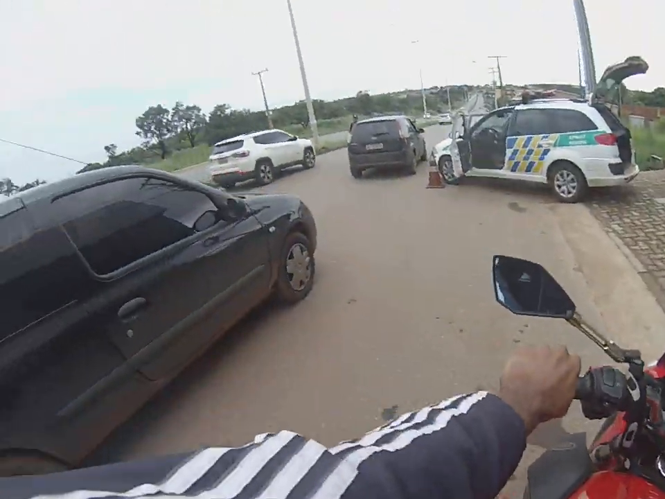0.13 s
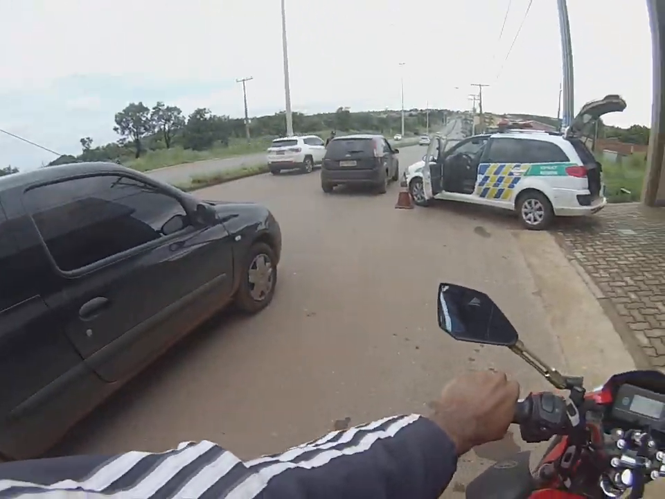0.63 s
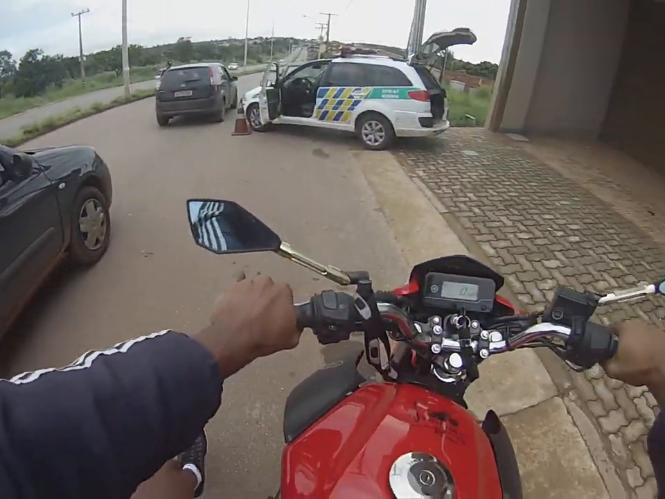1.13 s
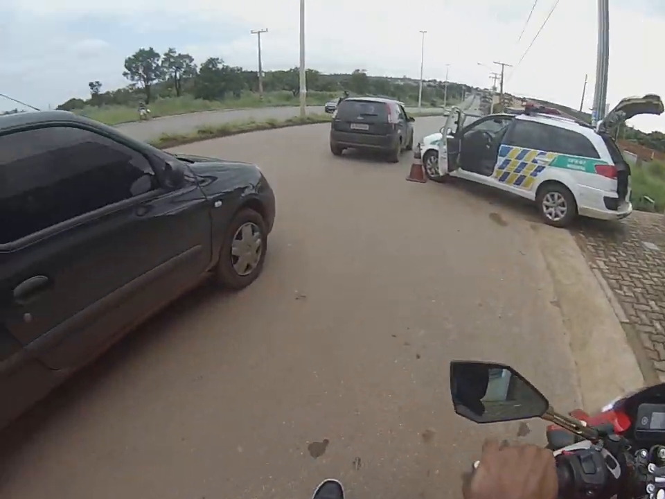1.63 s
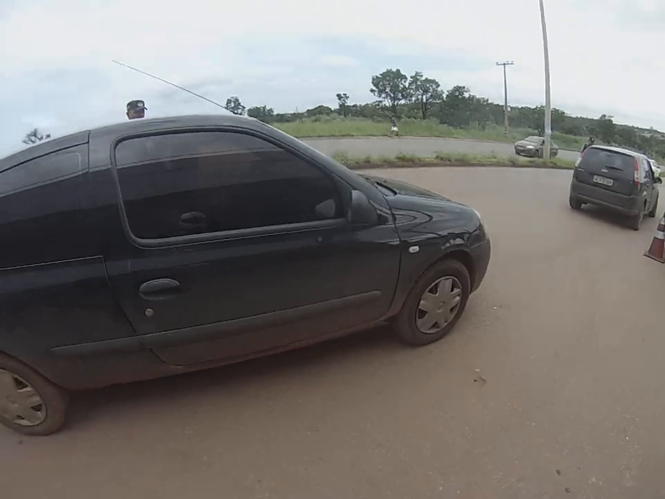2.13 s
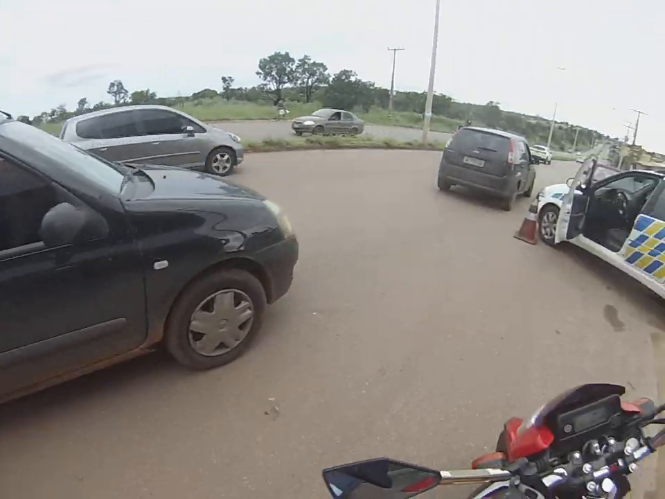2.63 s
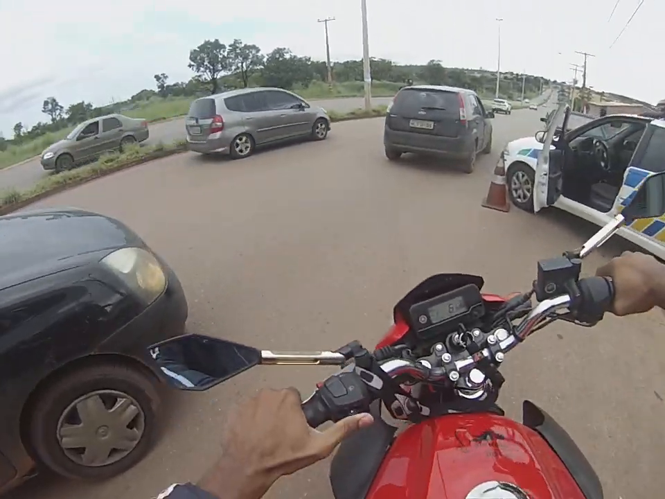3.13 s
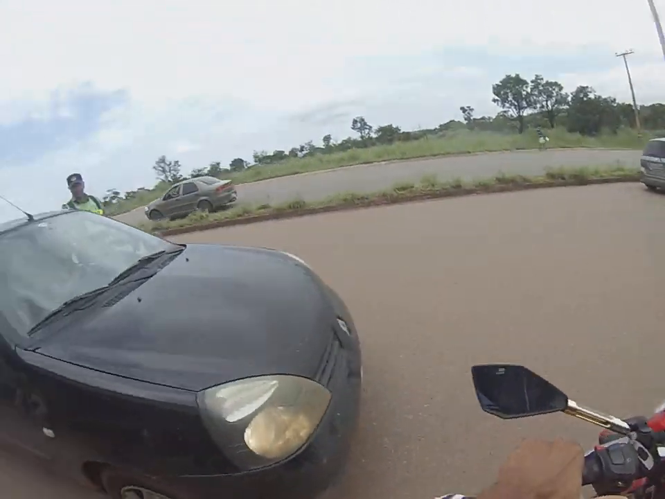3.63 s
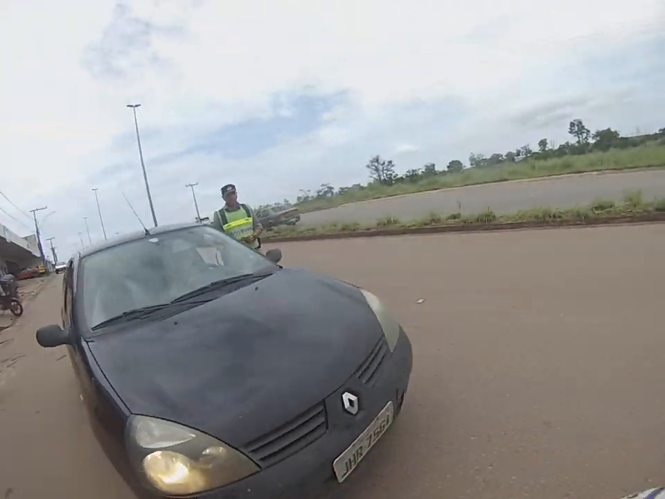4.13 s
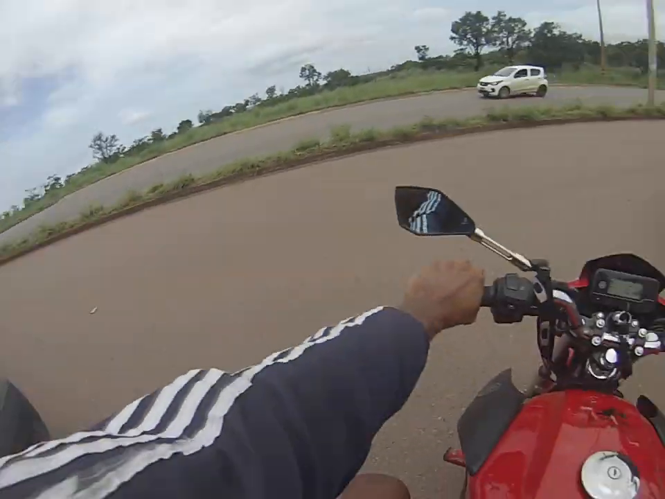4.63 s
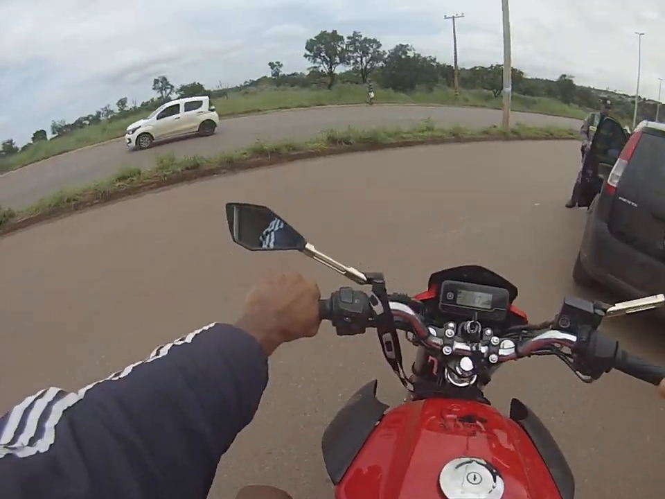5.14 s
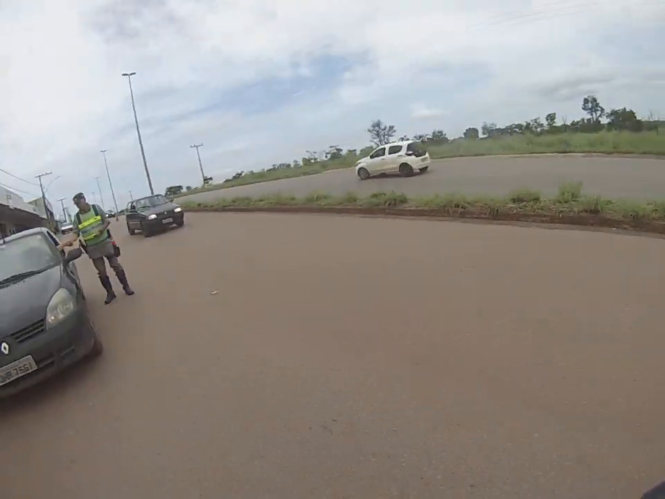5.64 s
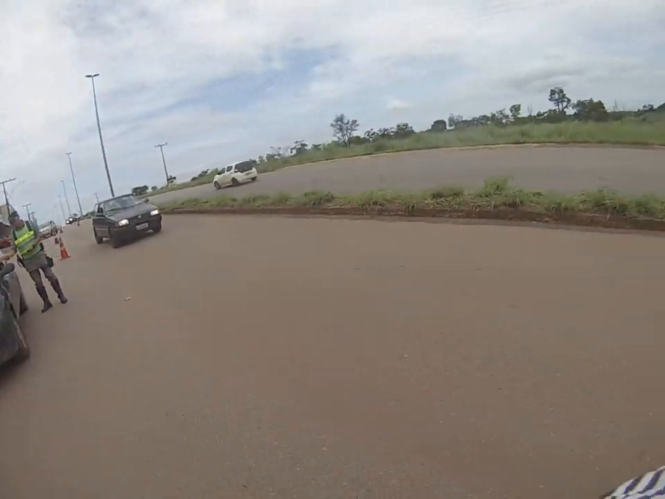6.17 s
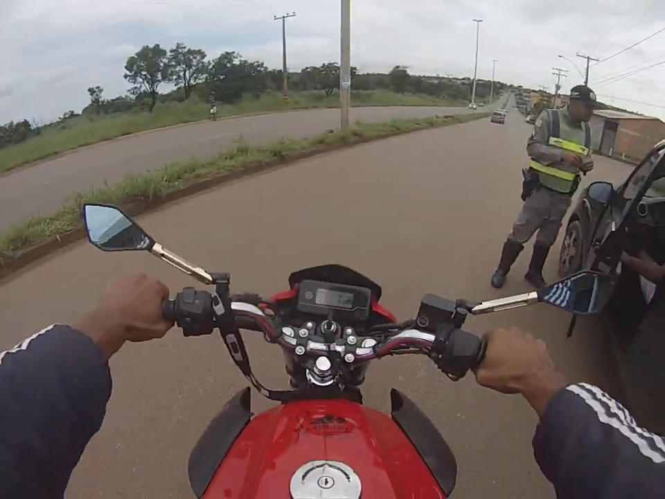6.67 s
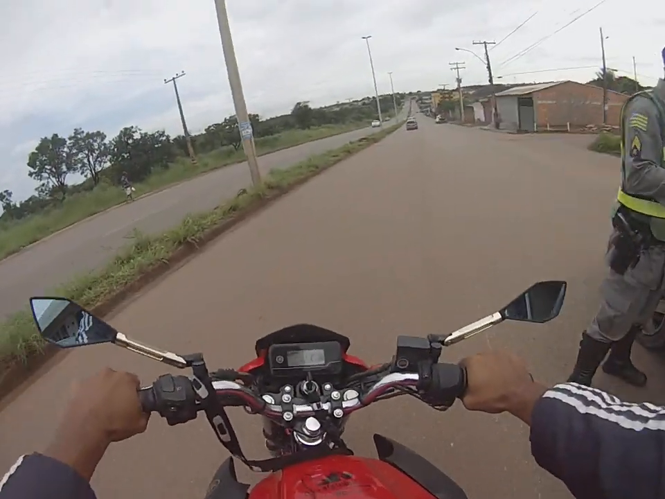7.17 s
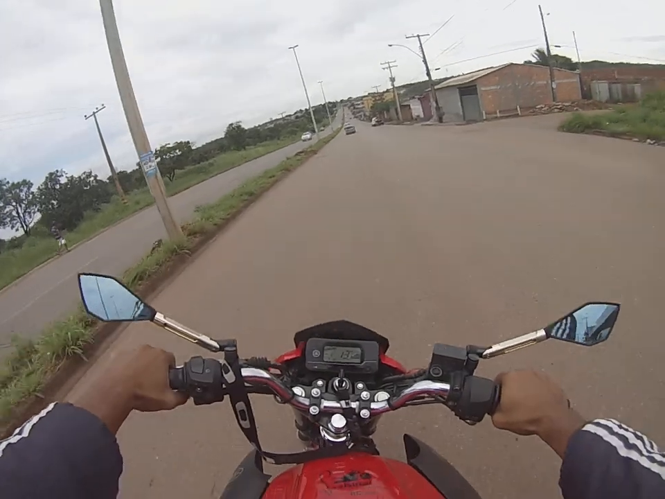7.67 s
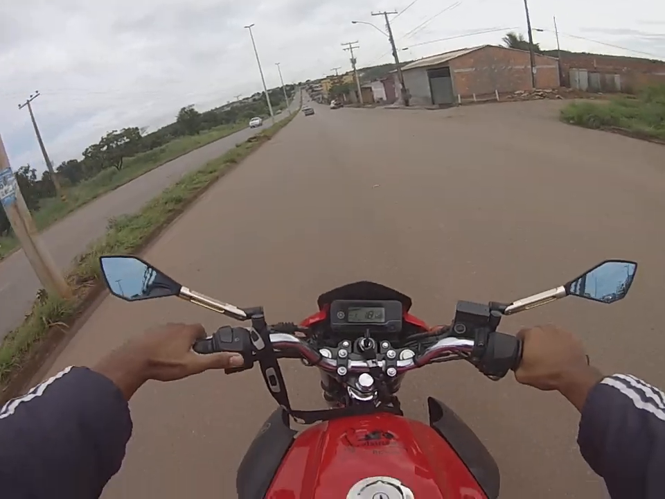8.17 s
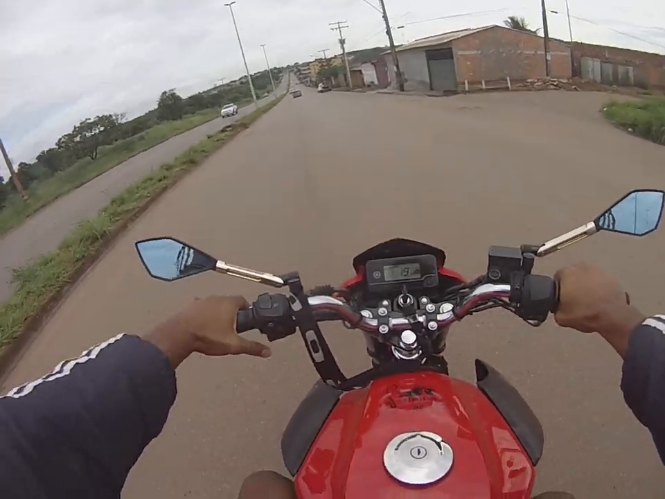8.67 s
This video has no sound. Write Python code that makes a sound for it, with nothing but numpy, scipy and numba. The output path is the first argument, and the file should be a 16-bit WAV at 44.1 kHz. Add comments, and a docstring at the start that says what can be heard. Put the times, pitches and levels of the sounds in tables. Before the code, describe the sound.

Muffled helmet view of a lumpy motorcycle idle, a violent plastic knock near five seconds, then throttle opens and revs rise steadily.

```python
"""On a motorcycle in traffic, heard by a helmet camera muffled in its case: one cylinder idles, then pulls away.
Each firing rings the exhaust pipe as decaying sines; under load the pressure fronts add thin snaps.
Shaped noise makes the engine drone, ticking valve gear, wind rumble, traffic hiss, whirs and cloth rustles.
The rider snaps the visor shut: blows ring shell, visor and latch, overload the input and duck the gain."""
import sys
import numpy as np
from scipy import signal
from scipy.fft import rfft, irfft, next_fast_len
from scipy.io import wavfile
from scipy.ndimage import uniform_filter1d
from numba import njit

SR = 44100
rng = np.random.default_rng(int(sys.argv[2]) if len(sys.argv) > 2 else 0)


def makeup_ratio(level_db):
    """Linear amplitude ratio for a level in decibels (20 dB per factor of ten)."""
    decades = np.asarray(level_db, float) / 20
    return 10 ** decades


def inscribe(sig):
    """Save sig as 16-bit PCM at rate SR to the path in sys.argv[1].

    A 1-D sig is mono; a 2-D sig holds one channel per row.
    Samples are clipped to [-1, 1] before scaling.
    """
    pcm = np.round(np.clip(np.atleast_2d(sig).T, -1, 1) * 32767)
    wavfile.write(sys.argv[1], SR, pcm.astype(np.int16))


N = 387638
T = np.arange(N) / SR


def curve(table):
    """Columns of a table drawn as signals over its first column, in seconds."""
    s, *columns = np.transpose(table)
    return [np.interp(T, s, c) for c in columns]


def colour(x, points):
    """Shape the spectrum by (Hz, dB) points, straight in log frequency; rms 1."""
    hz, db = np.transpose(points)
    size = next_fast_len(N)
    bins_hz = np.arange(size // 2 + 1) * SR / size
    gain = makeup_ratio(np.interp(np.log(bins_hz + 1), np.log(hz), db))
    y = irfft(rfft(x, size) * gain, size)[:N]
    return y / np.std(y)


def noise(points):
    """Steady noise of rms 1 with the given spectrum."""
    return colour(rng.standard_normal(N), points)


def smooth_twice(x, k):
    """Two running means of k samples."""
    return uniform_filter1d(uniform_filter1d(x, k), k)


def walk(rate):
    """Random levels held 1 / rate s and slewed twice; spread near 0.5."""
    k = int(SR / rate)
    held = np.repeat(rng.standard_normal(N // k + 1), k)
    return 0.7 * smooth_twice(held, k)[:N]


def ring(hz, t60, length):
    """Decaying sines, one row a mode, each falling 60 dB in its t60."""
    t = T[:int(length * SR)]
    decay = np.exp(-np.log(1000) * np.outer(1 / t60, t))
    return np.sin(2 * np.pi * np.outer(hz, t)) * decay


def strike(blows, modes):
    """Ring a body's (Hz, dB, t60 s) modes with a signal of blows."""
    hz, db, t60 = np.transpose(modes)
    return signal.fftconvolve(blows, makeup_ratio(db) @ ring(hz, t60, .8))[:N]


def add(out, i, x):
    """Mix x into out from sample i."""
    out[i:i + len(x)] += x[:len(out) - i]


def background_swing():
    """Slow swing shared by the steady layers, in dB; each layer takes its own share of it."""
    # Level of the steady background. Each row: time in seconds, swing in dB before a layer's share.
    swing = [(0, -4), (.5, 1.1), (1, -1.8), (1.6, 1.2), (2.4, 0.4), (3, 3), (3.7, 1.1), (4.1, -1),
             (4.6, 1.5), (5.5, 4), (6.3, 1), (6.8, -1), (7.8, -6.5), (8.4, -4.5), (8.79, -2)]
    return curve(swing)[0]


def traffic_hiss():
    """Traffic hisses through the case: noise weighted to the lower treble, wavering in level."""
    # Spectrum of the traffic through the case. Each row: frequency in Hz, level in dB.
    spectrum = [(500, -4), (800, -0.5), (1600, -6), (1800, -14.5), (2200, -11), (2900, -28.5), (4000, -40),
                (8000, -62)]
    level_db = -47 + 1.05 * background_swing()
    return makeup_ratio(level_db + 1.3 * walk(13)) * noise(spectrum)


def wind():
    """Wind on the microphone port: low rumble that wanders slowly and swells in gusts."""
    # Gusts on the port. Each row: peak time in seconds, rise above the breeze in dB, bell width in seconds.
    gusts = [(3.96, 10.5, .07), (6.82, 7, 0.12), (8.79, 9, 0.11)]
    level_db = -42.5 + 0.66 * background_swing()
    for s, db, width in gusts:
        level_db = level_db + db * np.exp(-.5 * ((T - s) / width) ** 2)
    rumble = noise([(8, -6.5), (25, 10.5), (45, 16), (80, 1.5), (200, -51.0)])  # Hz, dB
    return makeup_ratio(level_db + 3.6 * walk(1.6)) * rumble


def rustles():
    """Jacket and strap: brief bright scratches of noise that start at once and die away."""
    # Cloth scratches. Each row: start in seconds, level in dB, decay time in ms.
    scratches = [(.59, -47, 30), (0.853, -55, 16), (1.44, -53, 21), (3.508, -46, 2.4), (3.6965, -37.5, 3.4),
                 (3.851, -53, 3), (4.346, -50.5, 5.5), (4.43, -49, 3.7)]
    # Spectrum of the cloth. Each row: frequency in Hz, level in dB.
    spectrum = [(2000, -30), (3500, -6.5), (4500, 7), (6000, -3.5), (8500, -11), (12000, -18.5),
                (16000, -51.5)]
    envelope = np.zeros(N)
    for s, db, ms in scratches:
        add(envelope, int(s * SR), makeup_ratio(db) * np.exp(-T[:4000] * 1000 / ms))
    return envelope * noise(spectrum)


def whirs():
    """Running gear: noise rung through narrow resonances swells in and out."""
    # Whirs. Each row: pitch in Hz, ring t60 in seconds, start in seconds, end in seconds, level in dB.
    resonances = [(2070, .16, 6.3, 7.6, -61), (4300, .02, 8.1, 9.2, -65), (1250, .06, 8.3, 9.2, -62)]
    out = np.zeros(N)
    for hz, t60, start, end, db in resonances:
        tone = strike(rng.standard_normal(N), [(hz, 0, t60)])
        progress = np.clip((T - start) / (end - start), 0, 1)
        fade = np.sqrt(np.sin(np.pi * progress).clip(0))
        out += makeup_ratio(db) * tone / np.std(tone) * fade
    return out


def firing_swell(cycles):
    """Envelope that jumps up close to each firing and dies away over part of the cycle."""
    return smooth_twice(np.exp(-((cycles + 0.057) % 1) / 0.31), 150)


def drone(cycles):
    """Engine drone: low noise that swells with each firing."""
    # Spectrum of the drone. Each row: frequency in Hz, level in dB.
    spectrum = [(30, -20.5), (90, -3.5), (160, -2), (270, -7.5), (400, -3.5), (520, -9), (640, -20),
                (800, -36), (1200, -84)]
    level_db = -25 + 0.79 * background_swing()
    return (1 + 0.38 * firing_swell(cycles)) * makeup_ratio(level_db + 1.15 * walk(25)) * noise(spectrum)


def valve_gear(cycles):
    """Valve gear ticks as treble noise swelling with each firing; a brighter rattle follows and grows under load."""
    # Spectrum of the valve gear. Each row: frequency in Hz, level in dB.
    valve_spectrum = [(2500, -18.5), (3400, -4.5), (4200, 3), (5300, -1), (6500, -7), (8000, -13),
                      (11600, -19), (14000, -40), (16000, -70)]
    # Spectrum of the bright rattle. Each row: frequency in Hz, level in dB.
    rattle_spectrum = [(3000, -30), (4400, -5), (6000, -0.5), (8000, -1), (11000, -6), (14000, -12),
                       (16000, -45)]
    rattle_db, rattle_cycles = -4.5, .2  # against the valve gear; decay in engine cycles
    pull_s, load_db = 5.8, 5  # the throttle opens and the rattle grows
    level_db = -61 + .95 * background_swing()
    valves = (1 + .5 * firing_swell(cycles)) * makeup_ratio(level_db + 0.65 * walk(30)) * noise(valve_spectrum)
    puff = uniform_filter1d(np.exp(-((cycles - 0.02) % 1) / rattle_cycles), size=80)
    rattle_level_db = level_db + rattle_db + load_db * (T > pull_s) + 5 * walk(14)
    return valves + puff * makeup_ratio(rattle_level_db) * noise(rattle_spectrum)


def knocks(blow=0.39, contact_hz=(900, 3500, 9000)):
    """Visor: a blow and a short scrape ring shell, visor plastic and metal latch; softer parts get a duller push."""
    # Visor knocks. Each row: start in seconds, level in dB, scrape time constant in ms,
    # push on the visor in dB against the shell, push on the latch in dB against the shell.
    hits = [(4.777, -32, 2.4, 10, -6), (4.855, -38.5, 2.2, 14, 10.5), (4.939, -26, 5.4, 1, -17),
            (4.958, -1, 4.6, -9.5, -30), (4.967, 1.5, 3.2, -3.5, -27.5), (4.9961, -2, 2.6, 1, -21),
            (5.012, -1.5, 4.2, -15, -35), (5.021, -3, 2.5, -14, -31), (5.0372, 23.5, 0.9, 4, -2),
            (5.047, 3, 2.2, -3.5, -28), (5.8915, -32, 1, 7, -6)]
    # Modes of the helmet shell. Each row: frequency in Hz, level in dB, t60 in seconds.
    shell = [(267, -10.5, 0.0028), (365, -9, 0.015), (450, -0.5, 0.05), (524, -5.5, 0.084)]
    # Modes of the visor plastic. Each row: frequency in Hz, level in dB, t60 in seconds.
    visor = [(870, -6, 0.012), (1135, -5, 0.018), (1490, 0, 0.0054), (1794, -3, 0.0093), (2210, -13, 0.019)]
    # Modes of the metal latch. Each row: frequency in Hz, level in dB, t60 in seconds.
    latch = [(3070, -4, 0.0095), (5050, -7, 0.0073), (6900, -19, 0.005), (2290, -42, 0.25),
             (2720, -54.5, 0.91), (3058, -57.5, .55), (3305, -57, 0.39), (5093, -58.5, 0.35)]
    pushes = np.zeros((3, N))
    for s, db, ms, visor_db, latch_db in hits:
        u = T[:3000] * 1000 / ms
        # a brief snap is nearly all blow, a long drag nearly all scrape
        scrape = min(ms / 3, 1) * rng.standard_normal(3000) * u * np.exp(-u)
        burst = scrape / np.sqrt(ms * SR / 4000)
        burst[0] -= blow
        for push, share_db in zip(pushes, (0, visor_db, latch_db)):
            add(push, int(s * SR), makeup_ratio(db + share_db) * burst)
    out = np.zeros(N)
    for push, hz, modes in zip(pushes, contact_hz, (shell, visor, latch)):
        softened = signal.lfilter(*signal.butter(2, hz, fs=SR), push)
        out += strike(softened, modes)
    return out


def exhaust(rate, cycles, scatter_db=.6, detune=.002, snap_scatter_db=1.8):
    """Each firing pushes gas into the pipe; hot gas carries sound faster, so most modes rise with engine speed."""
    # Pipe modes at gas heat 0, 0.5 and 1. Each row: frequency in Hz, t60 in seconds, signed relative gain.
    pipe_idle = [(59.5, 0.087, -0.17), (102, 0.18, 0.67), (143.4, 0.055, 0.94), (174.1, 0.23, -0.29),
                 (237, 0.02, -0.69), (330, 0.02, -0.48), (369.4, 0.26, -0.28), (493, 0.15, -0.97),
                 (600, .04, 0.73)]
    pipe_pull = [(76, 0.037, 0.061), (112.8, 0.07, 0.54), (140, 0.024, 0.17), (186.3, 0.11, -0.55),
                 (310, 0.042, -0.86), (377, 0.2, 0.1), (428, 0.053, -0.22), (506.3, .12, -0.24),
                 (580, 0.057, .06)]
    pipe_rev = [(96, 0.051, 0.3), (142, 0.024, 0.13), (183, 0.05, 0.68), (206.9, 0.12, -0.69),
                (310, 0.045, -0.49), (381, 1, 0.059), (436.3, 0.085, -0.54), (533, 0.087, -0.14),
                (566, 0.037, 0.27)]
    # Width of the gas push: its bell's standard deviation in ms at gas heat 0, 0.5 and 1.
    push_ms = (1, 0.62, 0.39)
    # Strength of the firings. Each row: time in seconds, level in dB.
    firing = [(0, 2), (3.96, 2.5), (4.03, 1), (4.3, 1.5), (4.95, 3.5), (6.28, 4), (6.55, 5.5), (6.7, 3.1),
              (7.5, 2.8), (7.75, -1.5), (8.79, -1)]
    # Spectrum of the snaps. Each row: frequency in Hz, level in dB.
    snap_spectrum = [(300, -13.5), (800, 5), (2000, -1), (4000, -8), (8000, -17.5), (12000, -23.5),
                     (16000, -45)]
    cold_rate, hot_rate = 10, 41.9  # firings per second at gas heat 0 and 1
    snap_db, snap_from_heat = -27, .15  # against the firing level, before colouring; none at idle
    rebound_ms, rebound_db = 4.6, -8  # the trough after the crest snaps too
    crackle_size, crackle_ms = .2, 1.1  # turbulent tail against the front; decay time

    heat = np.clip((rate - cold_rate) / (hot_rate - cold_rate), 0, 1)
    firing_db = curve(firing)[0]
    pipes = np.array([pipe_idle, pipe_pull, pipe_rev])
    pipe, snaps = np.zeros(N), np.zeros(N + SR)
    for i in np.flatnonzero(np.diff(np.floor(cycles))):
        chance = rng.standard_normal(13)
        share = np.clip(1 - np.abs(2 * heat[i] - np.arange(3)), 0, 1)  # blend of the three heats
        hz, t60, gain = np.tensordot(share, pipes, axes=1).T
        push = np.exp(-.5 * (np.arange(-200, 201) * 1000 / SR / (share @ push_ms)) ** 2)
        tone = gain @ ring(hz * (1 + detune * chance[:9]), t60, 0.34)
        pulse = signal.fftconvolve(tone, push / push.sum())
        # the valve opens 2.6 ms before the pressure crest
        start = i - 200 - int(.0026 * SR)
        add(pipe, start, makeup_ratio(firing_db[i] + scatter_db * chance[9]) * pulse)

        # under load the pressure front steepens into a thin snap with a crackling tail
        crackles = crackle_size * rng.standard_normal((2, 200)) * np.exp(-T[:200] * 1000 / crackle_ms)
        crackles[:, 0] = 1
        snap = (heat[i] > snap_from_heat) * makeup_ratio(firing_db[i] + snap_db)
        add(snaps, i, snap * makeup_ratio(snap_scatter_db * chance[10]) * crackles[0])
        rebound_at = i + int((rebound_ms + .5 * chance[11]) * SR / 1000)
        rebound = snap * makeup_ratio(rebound_db + 2 * snap_scatter_db * chance[12])
        add(snaps, rebound_at, rebound * crackles[1])
    return pipe + np.std(snaps) * colour(snaps[:N], snap_spectrum)


def scene():
    """Surroundings, knocks and engine summed at one microphone."""
    # Engine speed, hunting at idle, then pulling. Each row: time in seconds, firings per second.
    revs = [(0.0, 12.399), (0.33, 10.492), (0.77, 10.948), (0.95, 9.696), (1.26, 10.923), (1.35, 8.663),
            (1.8, 10.3), (1.91, 9.453), (2.19, 10.599), (2.47, 10.418), (3.53, 12.132), (3.58, 10.496),
            (3.8, 12.275), (5.5, 10.355), (5.64, 11.356), (5.91, 10.199), (6.3, 11.438), (6.34, 18.833),
            (6.49, 24.443), (6.82, 23.946), (7.1, 25.594), (7.39, 25.88), (7.7, 30.48), (8.79, 39.343)]
    rate = curve(revs)[0]
    cycles = .573 + np.cumsum(rate) / SR  # a firing falls on each whole number
    around = traffic_hiss() + wind() + rustles() + whirs()
    engine = drone(cycles) + valve_gear(cycles) + exhaust(rate, cycles)
    return (around + knocks() + engine)[None]


@njit
def follow(x, attack, release):
    """Peak follower with separate rates for rise and fall."""
    e, out = 0., np.empty(len(x))
    for i in range(len(x)):
        e += (abs(x[i]) - e) * (attack if abs(x[i]) > e else release)
        out[i] = e
    return out


def duck(x, top_db, attack_ms, release_ms, smooth_ms=0.4):
    """Turn the gain down to hold the followed level at the top."""
    level = follow(x, 1000 / (attack_ms * SR), 1000 / (release_ms * SR))
    gain = np.minimum(1, makeup_ratio(top_db) / (level + 1e-9))
    return x * smooth_twice(gain, int(smooth_ms * SR / 1000) + 1)


def band_limit(x):
    """A steep low-pass at the top of the band."""
    return signal.sosfilt(signal.butter(12, 15950, fs=SR, output="sos"), x)


def record(dry):
    """Microphone input: slow gain control, quicker limiter, drift block, clipping, then a treble roll-off."""
    x = duck(dry[0], top_db=-5.0, attack_ms=2.97, release_ms=447)
    x = duck(x, top_db=4.5, attack_ms=6.6, release_ms=12)
    x = x - uniform_filter1d(x, size=4000)  # block slow drift
    clipped = np.clip(x, -1, 1)
    mix = signal.sosfilt(signal.butter(3, 11000, fs=SR, output="sos"), clipped)
    return band_limit(mix[None])


dry = scene()
out = record(dry)
inscribe(out)
```